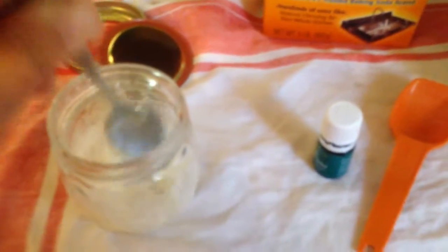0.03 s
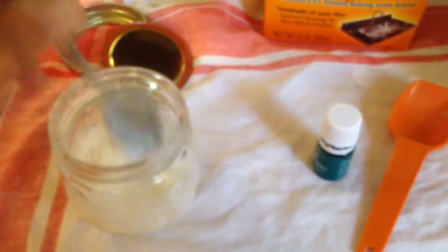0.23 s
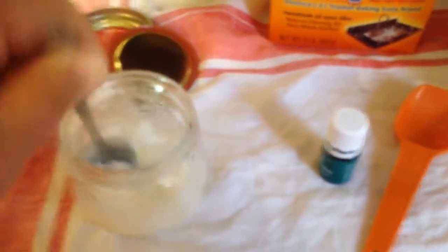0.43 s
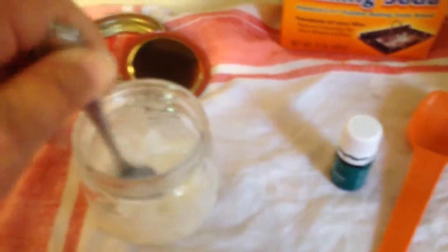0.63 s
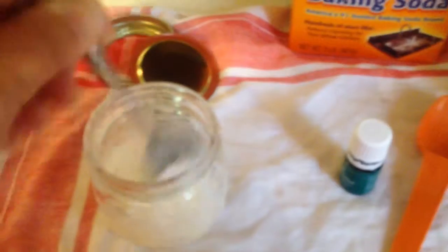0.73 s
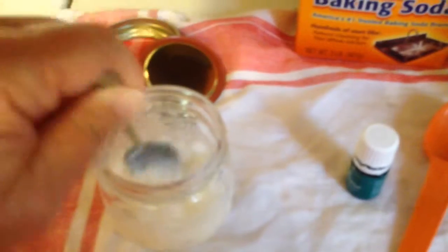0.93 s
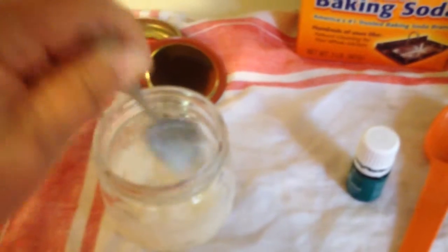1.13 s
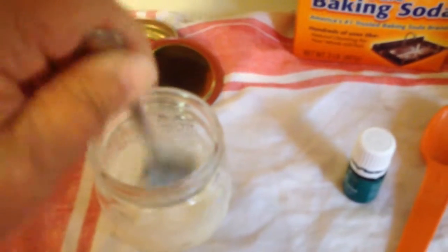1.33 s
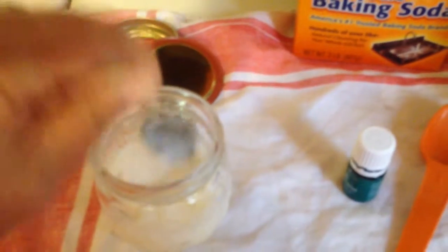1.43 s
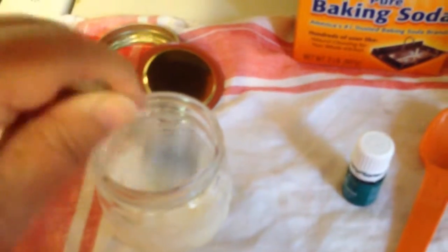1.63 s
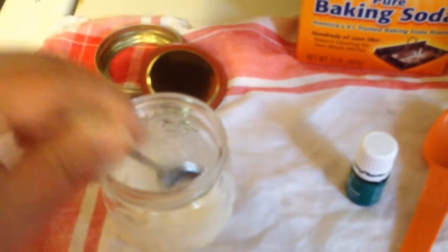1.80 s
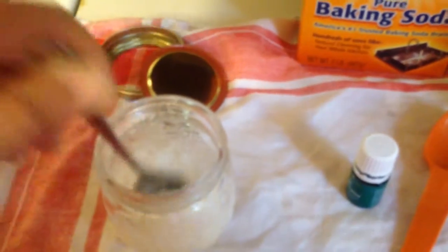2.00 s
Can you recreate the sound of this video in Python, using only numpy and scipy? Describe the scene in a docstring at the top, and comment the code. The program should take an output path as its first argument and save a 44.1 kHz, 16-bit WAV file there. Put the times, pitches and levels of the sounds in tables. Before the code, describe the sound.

A metal spoon clinks quickly and unevenly against a small glass jar as it stirs thick paste. Between the clinks come light ticks, gritty scraping and dull knocks of the jar rocking on a kitchen table, heard up close.

```python
"""At a cloth-covered kitchen table, a metal spoon stirs a thick paste in a small glass jar.
The spoon clinks on the glass, which the paste damps quickly; the jar rocks and knocks on the table,
which booms softly. Between the clinks the spoon ticks and scrapes through the gritty paste.
Each hit is ringing modes plus a noise crack, EQ'd band by band; the grit is tiny puffs of noise.
A short kitchen reverb and quiet room tone sit behind it all."""
import sys
import numpy as np
from scipy import signal
from scipy.fft import rfft, irfft, next_fast_len
from scipy.io import wavfile

SR = 44100
rng = np.random.default_rng(int(sys.argv[2]) if len(sys.argv) > 2 else 0)


def to_wav(s):
    """Save 16-bit WAV."""
    ch = np.atleast_2d(s).T  # columns
    pcm = np.round(np.clip(ch, -1, 1) * 32767)  # PCM
    wavfile.write(sys.argv[1], SR, pcm.astype(np.int16))


N = 90801
t = np.arange(round(.3 * SR)) / SR  # time within one hit

# room tone spectrum: f/Hz, level/dB
ROOM_TONE_EQ = [(25, -23.5), (75, -0.5), (110, -6), (300, -20), (1900, -21.5), (2800, -31), (7650, -35.5),
                (15500, -53)]
# kitchen reverb decay: f/Hz, t60/s
REVERB_DECAY = [(400, 0.35), (3000, 0.16), (7000, 0.14), (14000, 0.091)]
# reverb tone: f/Hz, level/dB
REVERB_EQ = [(200, -5.5), (1200, -13), (5000, -11), (14000, -25)]
# the microphone's soft top: f/Hz, level/dB
MIC_EQ = [(12000, 0), (15500, -2.5)]
# modes of the table top: f/Hz, level/dB, t60/s
TABLE_MODES = [(84.1, 1.5, .5), (99.7, -7, 0.83), (170.7, -20.5, 0.82), (198.6, -16.5, 0.45)]
# modes of the jar standing on the table: f/Hz, level/dB, t60/s
BASE_MODES = [(183.8, 2, 0.065), (331.6, 3, 0.054), (463, -1, 0.03), (650, -4, 0.05), (745, -9.5, 0.027)]
# modes of jar and spoon: f/Hz, level/dB, t60/s
GLASS_MODES = [(1046, 0.5, 0.025), (1495, -7.5, 0.012), (2043, -10, 0.023), (2830, -16.5, 0.075),
               (3673, 3, 0.0092), (4492, 1, 0.006), (6290, -8.5, 0.011), (7560, -1, 0.005)]
# first reflections off jar wall and table: delay/s, gain
REFLECTIONS = [(.001, 0.27), (.0024, 0.13)]
# tone of the crushed grains: f/Hz, level/dB
GRIT_EQ = [(500, -26), (1000, 9), (2200, 2.5), (3900, 5.5), (14000, -7)]
# how hard the spoon scrapes: t/s, level/dB
SCRAPE_FADER = [(.3, -22), (.45, 5), (0.8, -7.5), (1.1, 4.5), (1.25, -29), (1.55, 10), (1.7, -10),
                (1.79, 11), (1.95, -27)]
# EQ band edges for each kind of hit: f/Hz
TICK_EDGES = [800, 2900, 6500, 15500]
KNOCK_EDGES = [130, 250, 850, 1400, 5000, 15500]
CLINK_EDGES = [130, 850, 1300, 1800, 2900, 5000, 9500, 15500]
# light spoon touches and crushed grains: t/s, level/dB per band
TICK_CUES = [(0.319, -85, -89, -50), (.413, -58, -46.5, -58.5), (0.433, -57, -48, -53),
             (0.45, -60, -43, -43.5), (0.6468, -58.5, -67.5, -55.5), (0.7191, -47, -41.5, -51.5),
             (0.896, -57, -54, -56.5), (1.0647, -76, -44, -54.5), (1.0995, -57.5, -48.5, -51.5),
             (1.1243, -77, -59, -60), (1.296, -71, -51.5, -52.5), (1.3439, -54, -44.5, -59),
             (1.3979, -60.5, -56, -56.5), (1.6038, -72, -44, -50.5), (1.6442, -56.5, -61, -60.5),
             (1.864, -91, -68, -60.5), (1.884, -80, -76, -61)]
# the jar is pushed and rocks: t/s, level/dB per band
KNOCK_CUES = [(.001, -36.5, -34, -57.5, -58, -83), (0.505, -34, -36, -97, -44, -81),
              (0.703, -40, -37.5, -36.5, -50, -72), (0.981, -49, -45.5, -48.5, -57.5, -95),
              (1.106, -92, -55.5, -49, -55, -72), (1.3075, -43.5, -40.5, -46, -48, -57.5),
              (1.536, -41.5, -43, -33.5, -42, -47), (1.577, -55, -52, -68.5, -78, -65),
              (1.777, -42, -54.5, -62, -57, -51), (1.819, -41.5, -35, -37.5, -44.5, -59),
              (2.032, -57, -43, -51, -74.5, -68)]
# the spoon strikes the glass: t/s, level/dB per band
CLINK_CUES = [(0.2412, -25, -28, -31.5, -34, -25, -32.5, -45.5),
              (.368, -80, -70, -87, -77, -50.5, -54.5, -65),
              (.4720, -32.5, -26, -30, -29.5, -24.5, -29, -46.5),
              (0.6886, -29, -38.5, -38, -29, -33.5, -41.5, -53.5),
              (0.8730, -57.5, -55, -51, -45.5, -37.5, -42, -51.5),
              (1.4754, -51.5, -32, -39.5, -33, -23, -30.5, -36.5),
              (1.7445, -47, -32, -41.5, -38.5, -27, -21.5, -33)]
# where each clink lands: damped mode f/Hz, level/dB; lingering mode f/Hz, level/dB; rim level/dB
CLINK_SPOTS = [(4581, 0, 2654, -11, 4), (8970, 8, 8970, -3, -5), (3800, 9, 4560, -11, -16),
               (2180, 13, 2314, -6, -12), (3980, 2, 3460, -11, -3), (4470, 10, 9030, -17, 3),
               (8900, 5, 9040, -11, 0)]


def amp(db):
    """Decibels to gain."""
    return 10 ** (np.asarray(db) / 20)


def unit_rms(x):
    """Scales to rms 1."""
    return x / np.sqrt(np.mean(x ** 2) + 1e-20)


def curve_at(points, hz):
    """Reads a curve on a log-frequency axis."""
    f, value = np.transpose(points)
    return np.interp(np.log(hz + 1), np.log(f + 1), value)


def add(mix, start_s, sound):
    """Drops a sound into the mix at its cue."""
    part = mix[max(round(start_s * SR), 0):][:len(sound)]
    part += sound[:len(part)]


def eq(x, points):
    """Minimum-phase EQ along a curve of f/Hz, level/dB."""
    n = 2 * next_fast_len(len(x))
    cepstrum = irfft(np.log(amp(curve_at(points, np.fft.rfftfreq(n, 1 / SR)))), n)
    cepstrum[1:n // 2] *= 2  # folded forward: nothing rings ahead of the attack
    cepstrum[n // 2 + 1:] = 0
    return irfft(rfft(x, n) * np.exp(rfft(cepstrum)), n)[:len(x)]


def voice(x, edges, levels_db, low_cut_hz):
    """Cuts a hit's lows, then EQs each band to its level: where and how hard it lands sets the colour."""
    x = signal.sosfilt(signal.butter(3, low_cut_hz, "high", fs=SR, output="sos"), x)
    edges = np.array(edges, float)
    centres = np.sqrt(edges[1:] * edges[:-1])
    bins = (edges * len(x) / SR).astype(int)
    for _ in range(3):  # each pass gets closer
        energy = np.add.reduceat(abs(rfft(x)) ** 2, bins)[:-1] * 2 / len(x)
        band_db = 10 * np.log10(energy / (.02 * SR) + 1e-20)  # as if spread over 20 ms
        x = eq(x, np.c_[centres, np.array(levels_db) - band_db])
    return x


def ring(modes, scatter_db=1.5):
    """Dying modes, each excited a little differently by every hit."""
    gains = amp(scatter_db * rng.standard_normal(len(modes)))
    return sum(gain * amp(db - 60 * t / t60) * np.sin(2 * np.pi * hz * t)
               for gain, (hz, db, t60) in zip(gains, modes))


def jar_modes(rim_db, rim_hz=3300, rim_t60=.066):
    """The modes of the glass plus the clear ring of its rim."""
    return GLASS_MODES + [(rim_hz, rim_db, rim_t60)]


def strike(modes, crack_db, crack_t60, crack_rise_s=.00021, hump_width=.045):
    """Ringing modes, their first reflections and a crack of quickly damped modes crowded around them."""
    direct = ring(modes)
    body = direct.copy()
    for delay, gain in REFLECTIONS:
        add(body, delay, gain * direct)
    grid_hz = np.geomspace(50, 16000, 500)
    humps = sum(amp(db) / (1 + ((grid_hz / hz - 1) / hump_width) ** 2) for hz, db, _ in modes)
    crack_eq = np.c_[grid_hz, 20 * np.log10(humps + amp(-14))]  # a floor fills the valleys
    envelope = (1 - np.exp(-t / crack_rise_s)) * amp(crack_db - 60 * t / crack_t60)
    return body + eq(envelope * rng.standard_normal(len(t)), crack_eq)


def room_tone():
    """A quiet, steady bed of dark noise."""
    return amp(-56) * unit_rms(eq(rng.standard_normal(N), ROOM_TONE_EQ))


def kitchen_reverb(x):
    """A short diffuse tail, each band dying at its own speed."""
    hz, time, noise = signal.stft(rng.standard_normal(SR // 2), SR, nperseg=256)
    t60 = curve_at(REVERB_DECAY, hz)[:, None]
    tail = signal.istft(noise * amp(-60 * time / t60) / np.sqrt(t60), SR, nperseg=256)[1]
    tail *= np.minimum(np.arange(len(tail)) / SR / .001, 1)  # 1 ms fade-in
    return signal.fftconvolve(x, eq(tail / np.linalg.norm(tail), REVERB_EQ))[:N]


def table_boom(rise_s=.0039, fade_s=.21, clink_send_db=-6, knock_send_db=4.5):
    """The lowest band of each clink and knock sets the level of a slowly beating boom in the table."""
    out = np.zeros(N)
    envelope = (1 - np.exp(-t / rise_s)) * np.exp(-(t / fade_s) ** 6)
    for cues, send_db in (CLINK_CUES, clink_send_db), (KNOCK_CUES, knock_send_db):
        for start_s, low_db, *_ in cues:
            add(out, start_s, amp(low_db + send_db) * envelope * ring(TABLE_MODES))
    return out


def paste_grit(level_db=-60.5, grains_per_s=330, spread_db=2.5, grain_s=.0016):
    """Grains crush softly under the moving spoon, each a short puff of noise."""
    onsets = rng.random(N) < grains_per_s / SR
    sizes = amp(spread_db * np.minimum(rng.exponential(1, N), 4))
    envelope = signal.oaconvolve(onsets * sizes, t * np.exp(-t / grain_s))[:N]
    puffs = envelope * rng.standard_normal(N)
    scrape_db = np.interp(np.arange(N) / SR, *np.transpose(SCRAPE_FADER))
    return amp(level_db + scrape_db) * unit_rms(eq(puffs, GRIT_EQ))


def spoon_ticks():
    """Light touches that barely ring the glass: thin and mostly crack."""
    out = np.zeros(N)
    for start_s, *levels in TICK_CUES:
        hit = strike(jar_modes(rim_db=2), crack_db=26.5, crack_t60=.0081)
        add(out, start_s, voice(hit, TICK_EDGES, levels, low_cut_hz=815))
    return out


def jar_knocks():
    """The jar rocks on the cloth: duller hits with a low body."""
    out = np.zeros(N)
    for start_s, *levels in KNOCK_CUES:
        hit = strike(jar_modes(rim_db=-1) + BASE_MODES, crack_db=18, crack_t60=.016)
        add(out, start_s, voice(hit, KNOCK_EDGES, levels, low_cut_hz=86))
    return out


def spoon_clinks(damped_t60=.018, linger_t60=.13):
    """The spoon hits the jar wall; each spot favours one mode, lets another linger and rings the rim."""
    out = np.zeros(N)
    for (start_s, *levels), spot in zip(CLINK_CUES, CLINK_SPOTS):
        damped_hz, damped_db, linger_hz, linger_db, rim_db = spot
        spot_modes = [(damped_hz, damped_db, damped_t60), (linger_hz, linger_db, linger_t60)]
        hit = strike(jar_modes(rim_db) + BASE_MODES + spot_modes, crack_db=20, crack_t60=.019)
        add(out, start_s, voice(hit, CLINK_EDGES, levels, low_cut_hz=128))
    return out


def scene():
    """Mono mix: the stirring and its reverb over the table boom and room tone."""
    stirring = spoon_clinks() + jar_knocks() + spoon_ticks() + paste_grit()
    return (stirring + kitchen_reverb(stirring) + table_boom() + room_tone())[None]


def record(dry):
    """The microphone's soft top, then a steep high cut."""
    high_cut = signal.firwin(255, 15350, window=("kaiser", 8), fs=SR)
    return signal.oaconvolve(eq(dry[0], MIC_EQ), high_cut, "same")[None]


dry = scene()
out = record(dry)
to_wav(out)
```